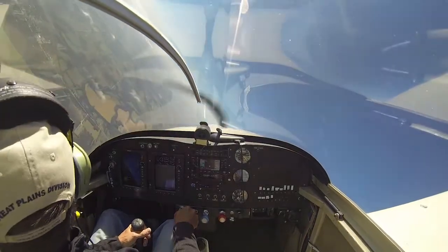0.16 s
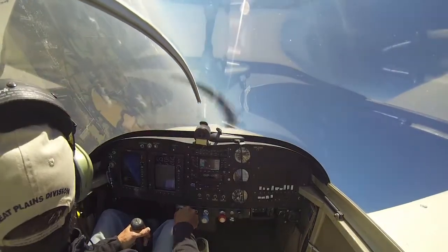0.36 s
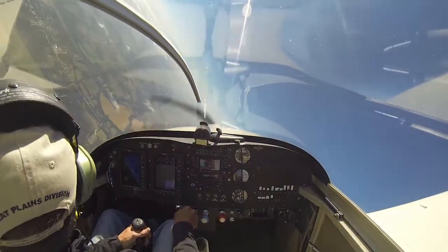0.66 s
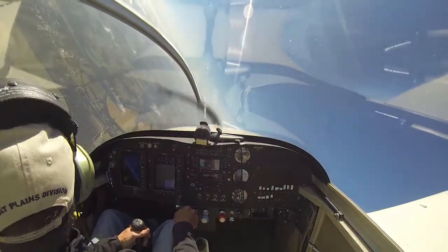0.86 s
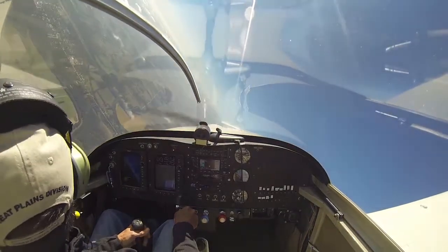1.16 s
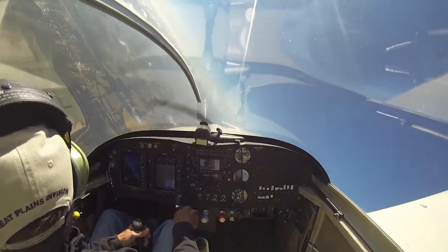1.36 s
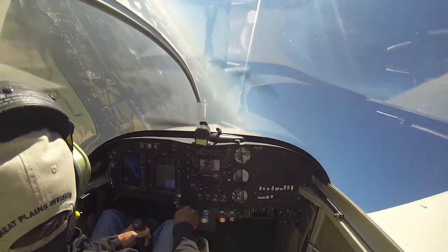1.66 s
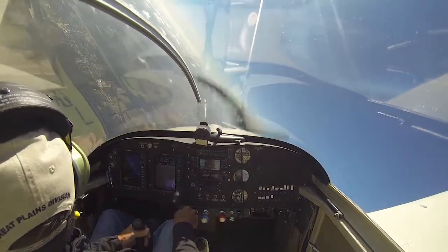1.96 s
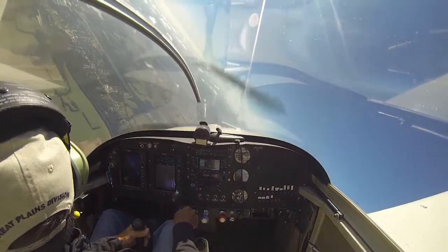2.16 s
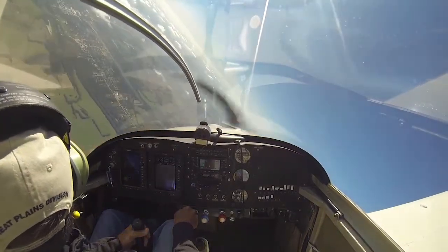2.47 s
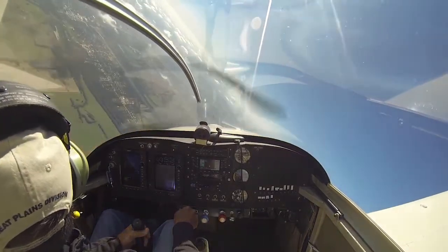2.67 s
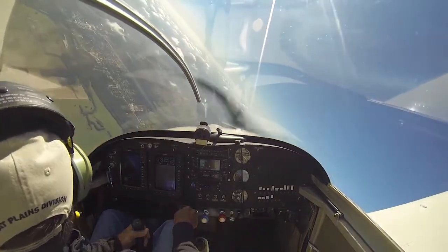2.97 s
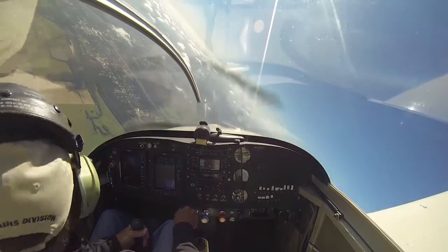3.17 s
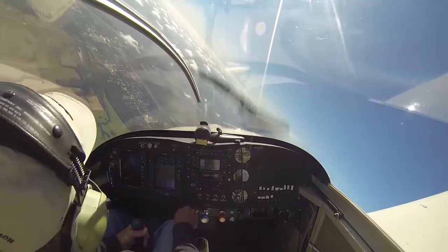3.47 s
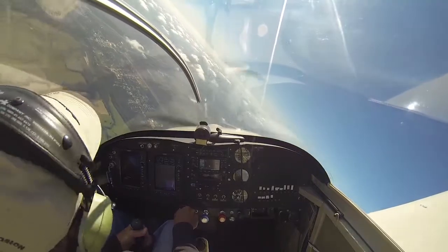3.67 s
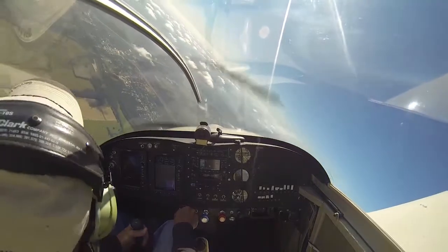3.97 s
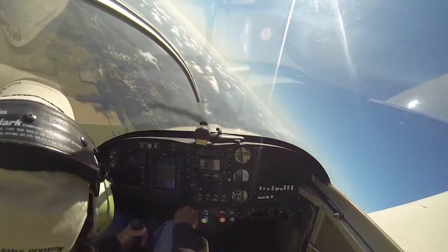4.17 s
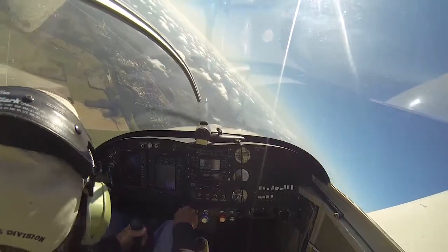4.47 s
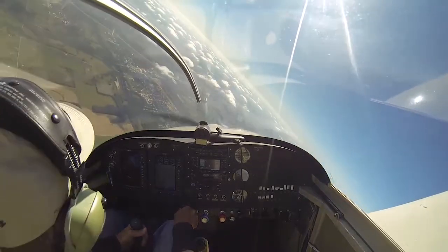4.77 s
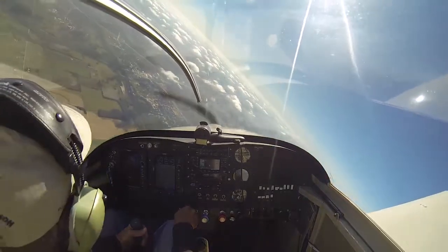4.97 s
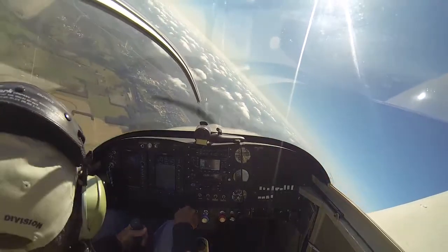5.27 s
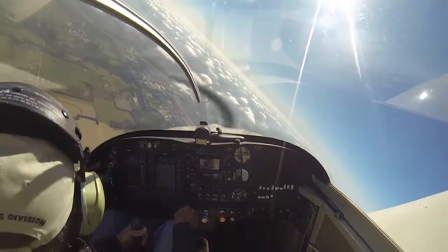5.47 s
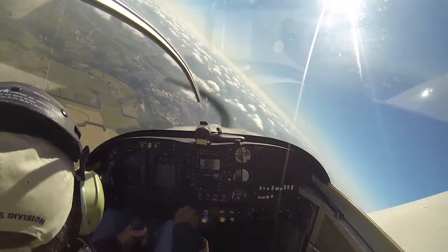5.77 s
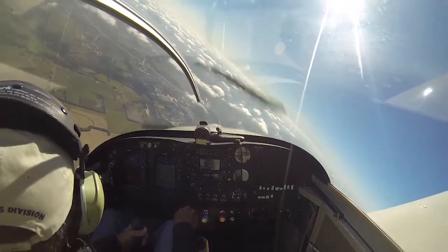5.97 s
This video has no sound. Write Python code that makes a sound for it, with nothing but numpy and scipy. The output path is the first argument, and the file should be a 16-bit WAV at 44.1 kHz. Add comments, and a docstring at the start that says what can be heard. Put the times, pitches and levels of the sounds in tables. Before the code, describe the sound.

Continuous raspy piston engine drone, nearly constant in pitch, with airframe rumble and wind rush swelling as the small plane gains speed.

```python
"""A steady engine drone is heard throughout, with air noise, inside the closed cockpit of a light aircraft
in a steep descending turn. Sines locked to one crankshaft form the tones of a four-cylinder four-stroke engine
and its two-bladed propeller. Noise pulsed by the firings excites panel resonances and makes a rasp.
Spectrally shaped noise makes the air rushing over the canopy, louder as the aircraft gathers speed,
and the low rumble of the airframe."""
import sys
import numpy as np
from scipy import signal
from scipy.fft import rfft, irfft, next_fast_len
from scipy.io import wavfile

SR = 44100
rng = np.random.default_rng(int(sys.argv[2]) if len(sys.argv) > 2 else 0)


def put_to_file(sound):
    """Save the sound as 16-bit audio at rate SR, in the file named by the first command-line argument."""
    columns = np.atleast_2d(sound).T  # one column per channel
    safe = np.clip(columns, -1, 1)
    whole_steps = np.round(safe * 32767)
    wavfile.write(sys.argv[1], SR, whole_steps.astype(np.int16))


N = 269892

# Drone where blade passes and firings add up: harmonic (multiple of firing rate), usual level_db
DRONE_HARMONICS = [(1, -14.5), (2, -24), (3, -23.5), (4, -28), (5, -26.5), (6, -30.5)]
# Swells and fades of single drone harmonics: middle_s, harmonic, half_length_s, change_db
DRONE_SWELLS = [(0.148, 3, 0.69, -7.5), (0.35, 6, 0.23, -10.5), (0.358, 2, 0.24, 3), (1.197, 4, 0.71, -15),
                (1.804, 5, 0.6, -3.5), (3.1, 3, 0.82, -5.5), (3.3, 6, 0.36, -8.5), (3.553, 3, 0.29, -18),
                (4.347, 2, 0.7, 4), (4.7, 3, 0.85, -6.5), (4.95, 1, 1.87, -3), (5.1, 4, 1.22, -6.5),
                (5.15, 5, 0.2, -3), (5.2, 6, 1.47, -13), (6.1, 2, 0.31, -4.5), (6.1, 5, 0.23, 4)]
# Lines from the unequal cylinders and the exhaust: order (multiple of crankshaft speed), usual level_db
ENGINE_ORDERS = [(1.0, -31.6), (1.5, -44.2), (2.5, -38.9), (3.0, -44.2), (3.5, -32.9), (4.5, -43.7),
                 (5.0, -43.1), (5.5, -45.1), (6.5, -33.1), (7.0, -44.3), (7.5, -30.9), (8.5, -46.5),
                 (9.5, -39.3), (10.5, -35.7), (11.0, -46.5), (11.5, -41.1), (12.5, -45.1), (13.5, -43.1),
                 (14.0, -40.3), (14.5, -39.3), (15.5, -40.1), (16.0, -41.9), (17.0, -45.1), (18.0, -47.6),
                 (19.0, -48.1), (20.0, -43.1), (20.5, -39.6), (21.0, -38.1), (21.5, -39.0), (22.0, -42.1),
                 (23.0, -40.1), (24.0, -42.0)]
# Relative strength of each cylinder's firing, in firing order: level_db
CYLINDER_LEVELS = [-2, -3, -3, -2]
# Panels that ring with the firings: pitch_hz, width_hz, relative level_db
PANEL_MODES = [(786, 33, -2.5), (805.5, 29, 9.5), (865, 33, 1), (926, 55, 3), (1022, 82, 0.5)]
# Relative strength of the airflow, growing with airspeed: time_s, level_db
AIRFLOW = [(0.0, -23.5), (1.6, -22), (4.1, -22), (6.12, -17.5)]
# Bumps of turbulence: middle_s, lift_db
TURBULENCE_BUMPS = [(1.38, 0.8), (1.56, 1.5), (1.92, 2), (3.2, 2), (3.48, 1.2), (4.52, 1.5), (4.88, 1.5)]
# Spectrum of air rushing over the canopy: frequency_hz, relative density_db per Hz
RUSH_SPECTRUM = [(300, -14.5), (740, -7), (900, 1), (1080, 0), (1300, -5.5), (1930, -5.5), (2350, -16.5),
                 (3100, -19), (3700, -26.5), (5400, -30), (6200, -37.5), (8000, -42.5), (11800, -53.5),
                 (14000, -65)]
# Canopy resonances and the thin whistle of its seal: pitch_hz, width_hz, lift_db
CANOPY_MODES = [(1386, 24, 4), (1602, 60, 2.5), (1760, 57, 4), (1880, 100, 2.5), (4270, 250, 3),
                (8770, 810, 9.5), (11200, 900, 4.5)]
# Spectrum of the airframe shaken by turbulent air: frequency_hz, relative density_db per Hz
RUMBLE_SPECTRUM = [(10, -16), (20, -9), (35, -5), (52, -14), (70, 6), (90, -2), (170, -1.5), (250, -0.5),
                   (340, -4), (480, -6), (580, -6.5), (720, -8), (1100, -23), (3000, -57.5)]

# The engine holds its speed, then winds up slightly in the dive and settles
START_RPM, TOP_RPM, WIND_UP_FROM_S, WIND_UP_RPM_PER_S = 2263.5, 2292.5, 0.55, 7.0
BUMP_HALF_S = 0.066
HISS_ABOVE_HZ, HISS_FOLLOWS = 2000, 0.68   # the hiss takes this share of the airflow's swing in dB
RASP_PER_BUMP = 1.5   # extra dB of rasp for each dB of a bump
CUTOFF_HZ = 15000   # stopband edge


def crank_turns(unsteady_share):
    """Phase as the integral of rate: shaft speed summed over time gives turns since the start."""
    t = np.arange(N) / SR
    rpm = np.clip(START_RPM + WIND_UP_RPM_PER_S * (t - WIND_UP_FROM_S), START_RPM, TOP_RPM)
    rpm = rpm * (1 + unsteady_share * drift(8.2))
    return np.cumsum(rpm / 60) / SR


def drone(turns, scatter_rad, waver_db):
    """Harmonic series: two pressure steps per turn, phases scattered more at higher harmonics by reflections."""
    out, t = 0, np.arange(N) / SR
    for harmonic, usual_db in DRONE_HARMONICS:
        k = round(harmonic)
        swell_db = 0
        for middle_s, which, half_s, change_db in DRONE_SWELLS:
            if round(which) == k:
                swell_db = swell_db + change_db * np.exp(-((t - middle_s) / half_s) ** 2)
        phase = 2 * np.pi * 2 * k * turns + scatter_rad * (k - 1) * rng.standard_normal()
        level_db = usual_db + swell_db + k * waver_db * drift(6.8)
        out = out + from_db(level_db) * np.sqrt(2) * np.sin(phase)   # root two: the level is rms
    return out


def exhaust(turns, waver_db, waver_rad):
    """Periodicity: the firing pattern repeats every second turn, so half orders beat against the drone."""
    out = 0
    for order, usual_db in ENGINE_ORDERS:
        exact_order = round(2 * order) / 2
        phase = 2 * np.pi * (exact_order * turns + rng.random()) + waver_rad * drift(0.49)
        level_db = usual_db + waver_db * drift(1.0)
        out = out + from_db(level_db) * np.sqrt(2) * np.sin(phase)
    return out


def firing_bursts(turns, decay_share, uneven_db):
    """Exponential decay: each firing starts at its cylinder's strength and falls until the next."""
    firing = (2 * turns).astype(int)
    since = 2 * turns % 1   # in firing intervals, as is decay_share
    chance_db = uneven_db * rng.standard_normal(N)[firing]
    strength_db = np.take(CYLINDER_LEVELS, firing, mode="wrap") + chance_db
    return rms_one(from_db(strength_db) * np.exp(-since / decay_share))


def panel_rasp(bursts):
    """Forced resonance: noise pulsed by the firings sets the firewall and cowling ringing."""
    knocks = bursts * rng.standard_normal(N)
    rings = sum(from_db(db) * resonate(knocks, hz, width_hz) for hz, width_hz, db in PANEL_MODES)
    band = signal.butter(2, [720, 1300], "band", fs=SR, output="sos")
    return rms_one(signal.sosfilt(band, rings))


def slipstream(bursts, throb_share, flutter_db):
    """Amplitude modulation: air noise through the canopy throbs a little with engine and propeller."""
    throb = 1 + throb_share * (bursts - 1)
    turbulence = rng.standard_normal(N) * throb * from_db(flutter_db * drift(13))
    return coloured(turbulence, RUSH_SPECTRUM, CANOPY_MODES)


def steady_hiss(air, gust_db):
    """Frequency-dependent gain: the top of the rush swells less than its middle."""
    high = signal.butter(2, HISS_ABOVE_HZ, "high", fs=SR, output="sos")
    hiss = signal.sosfiltfilt(high, air)   # zero phase, so it adds in step with the air
    return air + hiss * (from_db((HISS_FOLLOWS - 1) * gust_db) - 1)


def bumps_db():
    """Superposition of Gaussian envelopes: a short swell for each bump of turbulence."""
    t = np.arange(N) / SR
    return sum(db * np.exp(-((t - s) / BUMP_HALF_S) ** 2) for s, db in TURBULENCE_BUMPS)


def airframe_rumble():
    """Random excitation: turbulent air shakes the airframe, giving noise with mostly low frequencies."""
    return coloured(rng.standard_normal(N), RUMBLE_SPECTRUM)


def coloured(x, spectrum, modes=()):
    """Spectral shaping: noise takes a smooth spectrum, lifted at each resonance, with unit rms."""
    size = next_fast_len(N)
    hz = np.maximum(np.fft.rfftfreq(size, 1 / SR), 1)
    points_hz, levels_db = np.transpose(spectrum)
    db = np.interp(np.log(hz), np.log(points_hz), levels_db)
    for centre_hz, width_hz, lift_db in modes:
        db = db + lift_db / (1 + (2 * (hz - centre_hz) / width_hz) ** 2)
    return rms_one(irfft(rfft(x, size) * from_db(db), size)[:N])


def resonate(x, hz, width_hz):
    """Damped oscillator: a two-pole resonance with gain near 1 at its peak."""
    r = np.exp(-np.pi * width_hz / SR)
    zeros = np.array([1, 0, -1]) * (1 - r * r) / 2
    poles = [1, -2 * r * np.cos(2 * np.pi * hz / SR), r * r]
    return signal.lfilter(zeros, poles, x)


def drift(rate_hz):
    """Low-passed random process: slow chance of spread 1, changing about rate_hz times a second."""
    r = np.exp(-200 * np.pi * rate_hz / SR)   # one step per 100 samples
    chance = rng.standard_normal(N // 100 + 1002)
    slow = signal.lfilter([1], [1, -2 * r, r * r], chance)[1000:]   # drop the filter's start
    return np.interp(np.arange(N) / 100, np.arange(len(slow)), rms_one(slow))


def in_time(rows):
    """Linear interpolation: each column of a curve table, sample by sample."""
    s, *columns = np.transpose(rows)
    return [np.interp(np.arange(N) / SR, s, c) for c in columns]


def from_db(db):
    """Logarithmic level: decibels to amplitude gain."""
    return 10 ** (np.asarray(db) / 20)


def rms_one(x):
    """Normalisation of power: scale to unit rms."""
    return x / np.sqrt(np.mean(x ** 2) + 1e-20)


def scene():
    """Common causes: one shaft drives all tones; airflow drives rush and, more weakly, rumble; bumps lift rasp most."""
    turns, bump_db = crank_turns(unsteady_share=.0004), bumps_db()
    air_db = in_time(AIRFLOW)[0] + bump_db
    gust_db = air_db - air_db.mean()
    bursts = firing_bursts(turns, decay_share=0.99, uneven_db=1.8)

    tones = drone(turns, scatter_rad=0.44, waver_db=0.2433) + exhaust(turns, waver_db=1.35, waver_rad=0.14)
    rasp = from_db(-29.5 + 0.5 * gust_db + RASP_PER_BUMP * bump_db) * panel_rasp(bursts)
    air = slipstream(bursts, throb_share=0.07, flutter_db=0.4)
    rush = from_db(air_db - 3.0) * steady_hiss(air, gust_db)
    rumble = from_db(-25.4 + 0.52 * gust_db) * airframe_rumble()
    return (tones + rasp + rush + rumble)[None]


def record(dry):
    """Band limiting: a steep low-pass removes the top of the spectrum."""
    low_pass = signal.cheby2(12, 70, CUTOFF_HZ, fs=SR, output="sos")
    return signal.sosfilt(low_pass, dry)


dry = scene()
out = record(dry)
put_to_file(out)
```